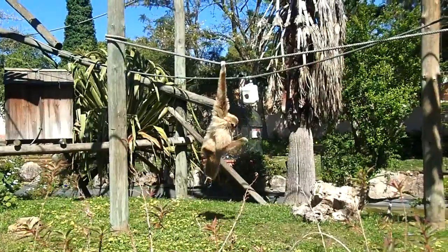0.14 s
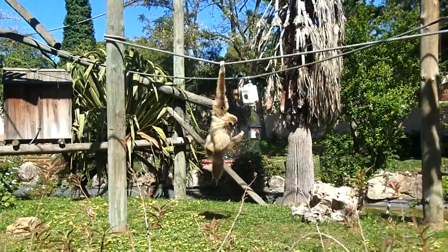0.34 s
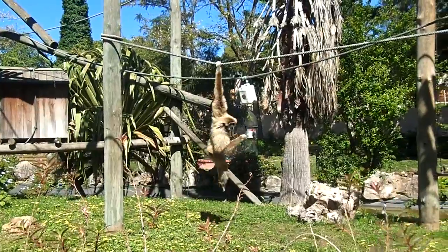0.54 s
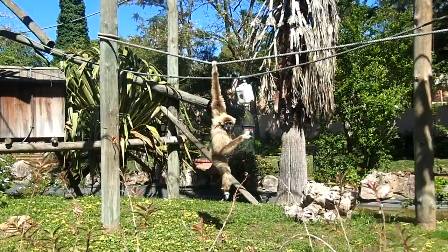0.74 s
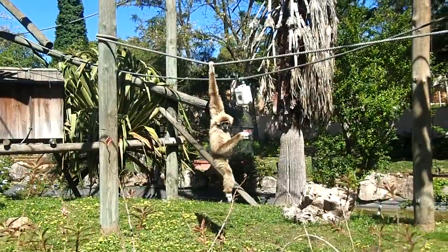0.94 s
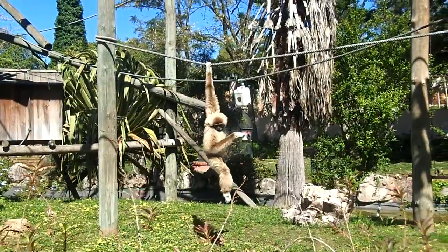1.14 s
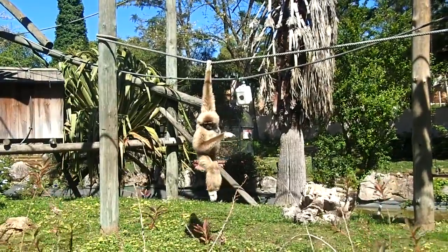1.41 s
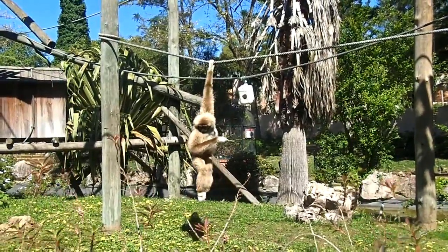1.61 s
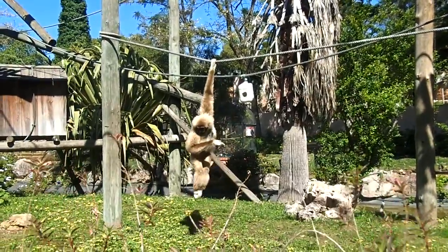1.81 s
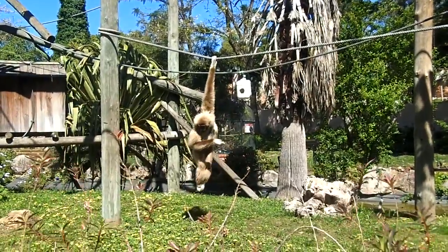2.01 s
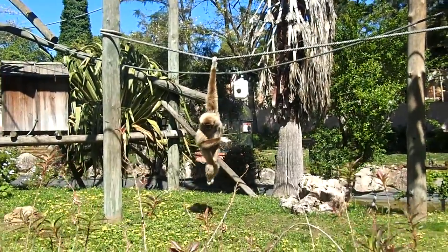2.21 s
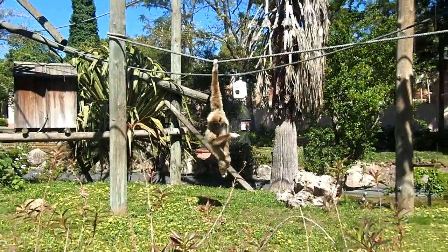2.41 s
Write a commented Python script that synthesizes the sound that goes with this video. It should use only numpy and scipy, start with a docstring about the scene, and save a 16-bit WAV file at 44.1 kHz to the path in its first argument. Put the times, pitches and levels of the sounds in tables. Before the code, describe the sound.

Four rising gibbon whoops echo lightly, with small birds chirping and a low hum behind.

```python
"""A steady outdoor hiss and a low machine hum are heard first, with the fading tail of an earlier call.
A gibbon hanging from a rope in its enclosure gives four rising whoops: near-pure tones with a thin,
bright edge of distortion when loud. Walls and trees answer with a few echoes and a long soft tail.
Small birds chirp in short gliding tones, and faint whistles come from far away.
During the last whoop there is a dull click, after which everything sounds a little hollow."""
import sys
import numpy as np
from scipy import signal
from scipy.fft import rfft, irfft
from scipy.io import wavfile
from scipy.ndimage import uniform_filter1d, minimum_filter1d

SR = 44100
rng = np.random.default_rng(int(sys.argv[2]) if len(sys.argv) > 2 else 0)


def master(y):
    """Save y as 16-bit WAV."""
    cut = np.clip(np.atleast_2d(y).T, -1, 1)
    pcm = np.round(cut * 32767)  # scale
    wavfile.write(sys.argv[1], SR, pcm.astype(np.int16))


N = 112454

# outdoor rumble and hiss: (frequency [Hz], level in each hertz [dB])
AIR_SPECTRUM = [(25, -88), (70, -79.5), (140, -75), (200, -77.5), (280, -77), (500, -73), (780, -76),
                (880, -68.5), (1020, -74), (1700, -74.5), (1880, -85.5), (2150, -81.5), (2650, -89),
                (3150, -83.5), (3500, -90), (4100, -88.5), (4500, -79.5), (5200, -72.5), (6000, -79.5),
                (7100, -87), (7900, -83.5), (9200, -94), (12000, -101), (16000, -104)]
# how wide noise sounds: (frequency [Hz], level of the ears' opposite part against their shared part [dB])
STEREO_WIDTH = [(50, -5), (120, -18), (300, -14.5), (900, -25), (2500, -28), (5000, -11.5), (8000, -6),
                (12000, 1.5)]
# tones of distant machinery: (pitch [Hz], level [dB], fade-in time [s])
HUM_TONES = [(50.6, -51.5, 0.73), (108.8, -52, 0.045), (137, -66.5, .05), (284.2, -64, 0.01997)]
# how each whoop rises, one list per whoop: (time [s], pitch [Hz])
WHOOP_PITCHES = [
    [(.18, 608.5), (.205, 623), (.25, 728.4), (.305, 793.2), (.355, 872)],
    [(.785, 587), (.82, 632.3), (.855, 680), (.892, 769), (.925, 919), (.945, 931)],
    [(1.348, 511), (1.40, 622.6), (1.432, 679), (1.455, 754), (1.47, 858.4), (1.486, 874)],
    [(2.095, 583.5), (2.143, 649.3), (2.175, 742.6), (2.192, 825), (2.206, 918), (2.225, 965)],
]
# how each whoop swells, one list per whoop: (time [s], level [dB])
WHOOP_LEVELS = [
    [(0.178, -39), (0.194, -25.5), (0.21, -17.5), (0.242, -22), (0.26, -13), (0.346, -15), (0.352, -18)],
    [(0.785, -35.5), (0.823, -21), (0.853, -19.5), (0.865, -26.5), (0.883, -16.5), (0.923, -18),
     (0.94, -22.5)],
    [(1.348, -40.5), (1.37, -28.5), (1.392, -36), (1.41, -21.5), (1.462, -14.5), (1.484, -21)],
    [(2.095, -42), (2.145, -18.5), (2.167, -39), (2.181, -17), (2.193, -13.5), (2.222, -31.5)],
]
# tone colour of each whoop; "high" means harmonics 4 to 14: (2nd harmonic boost [dB], 3rd boost [dB],
# high boost [dB], high tilt [dB per octave], high odd over even [dB], delay of the high swell [s])
WHOOP_COLOURS = [(-2, -6, -0.5, 1.5, 10, 0.0021), (2.5, -2, -1, 4, -4, .006), (-2.5, 1.5, 4, -9, 7, 0.022),
                 (0, -8, 1, -4, -3, 0.019)]
# overtones heard on the loudest whoops, before those boosts:
# (frequency [Hz], level against the main tone [dB])
WHOOP_OVERTONES = [(1250, -26), (1550, -23), (1850, -25.5), (2150, -27.5), (2500, -42), (2800, -49),
                   (3600, -50), (4400, -34), (5300, -24.5), (6200, -31), (7000, -33.5), (7900, -31.5),
                   (8800, -46), (9800, -64)]
# echoes from posts, rocks and walls: (delay [s], level against the direct sound [dB])
WALL_ECHOES = [(.0125, -18), (.026, -24.5), (.043, -28.5)]
# soft tails of blended echoes: (time to fade by 60 dB [s], relative level [dB])
ECHO_TAILS = [(.3, -10), (1.5, -16.5)]
# bird notes: (start [s], length [s], first pitch [Hz], middle [Hz], last [Hz], relative level [dB])
BIRD_CHIRPS = [(.422, 0.029, 5110, 5400, 5106, -31), (.552, 0.049, 6350, 6850, 6730, -32.5),
               (.622, 0.057, 4995, 6010, 6070, -32), (.66, 0.09, 6350, 6270, 5970, -40.5),
               (.718, 0.044, 5340, 4710, 4480, -33), (.755, .028, 5800, 5320, 4920, -31),
               (.835, .04, 5200, 5500, 5800, -29.5), (.933, 0.022, 4840, 4480, 4500, -31),
               (.975, 0.03, 5510, 5100, 4800, -31), (1.02, 0.012, 4500, 4500, 4400, -48),
               (1.118, 0.028, 4988, 5150, 5260, -52), (1.612, 0.065, 6500, 6480, 6220, -37),
               (1.72, 0.051, 4900, 5090, 4945, -32.5), (1.79, 0.062, 5300, 5000, 4860, -36.5),
               (1.84, 0.035, 4660, 4550, 4830, -48), (2.108, 0.028, 5450, 5500, 5340, -50),
               (2.213, 0.062, 5700, 6220, 6600, -35.5), (2.302, 0.044, 6250, 6450, 6190, -34)]
# far whistles: (start [s], length [s], first pitch [Hz], middle [Hz], last [Hz], level [dB])
FAR_WHISTLES = [(.56, 0.35, 1690, 1745, 1780, -43), (.965, .06, 1660, 1548, 1510, -38),
                (1.9, 0.162, 1680, 1720, 1790, -46.5)]
# the hollow tone after the click: (frequency [Hz], level change [dB])
HOLLOW_COLOUR = [(55, 2), (110, -3), (220, -4.5), (330, -1), (480, -5), (650, -4.5), (950, -1.5),
                 (1400, -10.5), (1900, -14), (2150, -20), (2700, -6), (3300, -8.5), (3700, -11),
                 (4050, -24), (4500, -5.5), (5300, -7.5), (6500, -4), (16000, 2)]
# how much louder the left side is: (frequency [Hz], left minus right [dB])
LEFT_BOOST = [(100, .5), (700, 0.96), (2000, 0.24), (5000, 3.2), (8000, 4.6), (12000, 1.3)]

LEAD_S = .6   # room for a call made before the scene opens
AIR_FLICKER_DB, HUM_WAVER_DB = 0.73, -0.6
PITCH_JITTER, SHIMMER_DB, OVERTONE_FLUTTER_DB, RASP_DB = 0.0034, 1, 4, -9.5
LOUD_WHOOP_DB, TILT_PIVOT_HZ = -18, 5280
BRIGHTENING = 0.35   # extra dB the overtones gain per dB of the main tone
ATTACK_S, RELEASE_S, LEVEL_SMOOTH_S = .015, .016, 0.032
EARLIER_WHOOP_S, EARLIER_WHOOP_DB = -0.32, -1
TAIL_BUILD_S, TAIL_DULL_HZ = .02, 4900
BIRD_DISTANCE_DB = -2
CLICK_S, CLICK_DB, CLICK_WIDTH_S = 2.1503, -17, 0.0003
RING_HZ, RING_DB, RING_FADE_S = 487, -16.5, .04
HOLLOW_FADE_S, LIMIT_DB, LIMIT_SMOOTH_S, CUTOFF_HZ = .003, -9, .003, 15800


def from_db(db):
    """Turn decibels into a number to multiply a sound by."""
    return 10 ** (np.asarray(db) / 20)


def at_hz(points, hz):
    """Read a (Hz, dB) table at any frequency, with octaves evenly spaced."""
    frequencies, db = np.transpose(points)
    return np.interp(np.log(np.maximum(hz, 1)), np.log(frequencies), db)


def colour(x, points):
    """Turn each frequency of a sound up or down by a (Hz, dB) table."""
    size = x.shape[-1]
    return irfft(rfft(x) * from_db(at_hz(points, np.fft.rfftfreq(size, 1 / SR))), size)


def drift(rate, size):
    """A random wander that heads for a new value `rate` times a second."""
    targets = rng.standard_normal(int(size / SR * rate) + 3)
    return np.interp(np.arange(size) / SR * rate, np.arange(len(targets)), targets)


def stereo_noise(size):
    """Noise that is mostly alike in both ears lower down and wide in the treble."""
    shared, opposite = rng.standard_normal((2, size))
    return shared + colour(opposite, STEREO_WIDTH) * np.array([[1], [-1]])


def add(track, start, sound):
    """Mix a sound into a track that begins LEAD_S early."""
    i = max(int((start + LEAD_S) * SR), 0)
    track[i:i + len(sound)] += sound[:len(track) - i]


def outdoor_air():
    """Steady rumble and hiss whose level flickers slightly."""
    hiss = np.sqrt(SR / 2) * colour(stereo_noise(N), AIR_SPECTRUM)
    return hiss * from_db(AIR_FLICKER_DB * drift(14, N))


def machine_hum():
    """Distant machinery: low tones that fade in and waver a little."""
    t = np.arange(N) / SR
    hum = np.zeros(N)
    for hz, db, fade_s in HUM_TONES:
        level = from_db(db + HUM_WAVER_DB * drift(8.7, N)) * (1 - np.exp(-t / fade_s))
        hum += np.sqrt(2) * level * np.sin(2 * np.pi * hz * t + 0.38 * drift(6.6, N))
    return hum


def whoop(glide, swell, second_db, third_db, high_db, tilt_db, odd_db, lag_s):
    """One rising, near-pure tone with a fluttering, raspy edge of distortion when loud."""
    times, db = np.transpose(swell)
    t = np.arange(times[0] - ATTACK_S, times[-1] + 4 * RELEASE_S, 1 / SR)
    size = len(t)
    pitch = np.interp(t, *np.transpose(glide)) * (1 + PITCH_JITTER * drift(300.6, size))
    phase = 2 * np.pi * np.cumsum(pitch) / SR
    loudness = from_db(np.interp(t, times, db) + SHIMMER_DB * drift(150, size))
    smooth_db = 10 * np.log10(uniform_filter1d(loudness ** 2, int(LEVEL_SMOOTH_S * SR)))
    overtone_db = smooth_db + BRIGHTENING * (smooth_db - LOUD_WHOOP_DB)
    late_db = np.interp(t - lag_s, t, overtone_db) + high_db   # high overtones swell a moment later
    levels = [overtone_db + second_db, overtone_db + third_db]
    for k in range(4, 15):
        levels.append(late_db + odd_db * (k % 2 - .5) + tilt_db * np.log2(k * pitch / TILT_PIVOT_HZ))
    tone = loudness * np.sin(phase)
    for k, level in enumerate(levels, start=2):   # harmonic k sounds at k times the pitch
        rasp = drift(700, size) * np.cos(k * phase) + drift(700, size) * np.sin(k * phase)
        flutter_db = OVERTONE_FLUTTER_DB * drift(73.3, size)
        strength = from_db(level + at_hz(WHOOP_OVERTONES, k * pitch) + flutter_db)
        tone += strength * (np.sin(k * phase) + from_db(RASP_DB) * rasp)
    fade_in = np.clip((t - t[0]) / ATTACK_S, 0, 1)
    fade_out = np.exp(-(np.maximum(t - times[-1], 0) / RELEASE_S) ** 2)
    return np.sqrt(2) * fade_in * fade_out * tone


def gibbon():
    """Four whoops, plus an earlier one of which only the echo tail is heard."""
    track = np.zeros(N + int(LEAD_S * SR))
    for glide, swell, tone_colour in zip(WHOOP_PITCHES, WHOOP_LEVELS, WHOOP_COLOURS):
        add(track, swell[0][0] - ATTACK_S, whoop(glide, swell, *tone_colour))
    earlier = whoop(WHOOP_PITCHES[0], WHOOP_LEVELS[0], *WHOOP_COLOURS[1])
    add(track, EARLIER_WHOOP_S, from_db(EARLIER_WHOOP_DB) * earlier)
    return track


def enclosure(x, tail_db):
    """Sound arrives directly, then bounces off walls and trees as a few echoes and soft tails."""
    t = np.arange(int(1.5 * SR)) / SR
    response = 0   # how the place answers one sharp tap
    for fade_s, db in ECHO_TAILS:
        shape = from_db(-60 * t / fade_s) * (1 - np.exp(-(t / TAIL_BUILD_S) ** 2))
        response += from_db(db + tail_db) * stereo_noise(len(t)) * shape / np.sqrt(np.sum(shape ** 2))
    response = signal.sosfilt(signal.butter(1, TAIL_DULL_HZ, fs=SR, output="sos"), response)
    for delay, db in WALL_ECHOES:
        response[:, int(delay * SR)] += from_db(db)
    response[:, 0] += 1   # the direct sound
    return signal.fftconvolve(x[None], response, axes=1)[:, int(LEAD_S * SR):][:, :N]


def birds(notes, waver):
    """Each chirp or whistle is a wavering pure tone that curves through three pitches."""
    track = np.zeros(N + int(LEAD_S * SR))
    for start, length, first, middle, last, db in notes:
        progress = np.linspace(0, 1, int(length * SR))
        curve = np.polyval(np.polyfit([0, .5, 1], [first, middle, last], 2), progress)
        pitch = curve * (1 + waver * drift(698, SR)[:len(progress)])
        swell = from_db(db) * np.sin(np.pi * progress)
        add(track, start, swell * np.sin(2 * np.pi * np.cumsum(pitch) / SR))
    return track


def click():
    """One dull, rounded pulse with a very short ring."""
    t = np.arange(N) / SR - CLICK_S
    after = np.maximum(t, 0)
    ring = from_db(RING_DB - 60 * after / RING_FADE_S) * np.sin(2 * np.pi * RING_HZ * after)
    return from_db(CLICK_DB) * np.exp(-(t / CLICK_WIDTH_S) ** 2) + ring


def turn_hollow(x):
    """At the click, the middle frequencies drop and everything sounds hollow."""
    blend = np.clip((np.arange(N) / SR - CLICK_S) / HOLLOW_FADE_S + .5, 0, 1)
    return (1 - blend) * x + blend * colour(x, HOLLOW_COLOUR)


def limiter(x):
    """Turn the volume down whenever the peaks pass the limit."""
    size = int(LIMIT_SMOOTH_S * SR)
    gain = np.minimum(1, from_db(LIMIT_DB) / (np.abs(x).max(axis=0) + 1e-9))
    return x * uniform_filter1d(minimum_filter1d(gain, size), size)


def scene():
    """Mix hiss, hum and click with the echoing birds and gibbon."""
    background = outdoor_air() + machine_hum()
    chirps = enclosure(birds(BIRD_CHIRPS, waver=0.031), tail_db=10.5) * from_db(BIRD_DISTANCE_DB)
    whistles = enclosure(birds(FAR_WHISTLES, waver=0.0022), tail_db=1.5)
    whoops = enclosure(gibbon(), tail_db=0.5)
    return background + whoops + chirps + whistles + click()


def record(dry):
    """Turn hollow at the click, make the left side brighter, hold down peaks and cut the top treble."""
    left, right = turn_hollow(dry)
    left = colour(left, [(hz, db / 2) for hz, db in LEFT_BOOST])
    right = colour(right, [(hz, -db / 2) for hz, db in LEFT_BOOST])
    treble_cut = signal.ellip(12, .1, 80, CUTOFF_HZ, fs=SR, output="sos")
    return signal.sosfilt(treble_cut, limiter(np.array([left, right])))


dry = scene()
out = record(dry)
master(out)
```